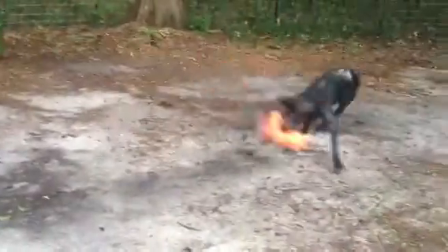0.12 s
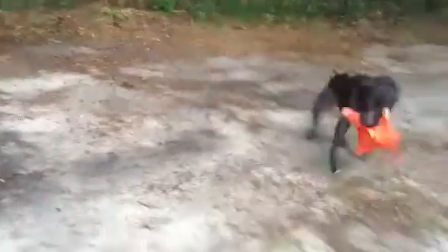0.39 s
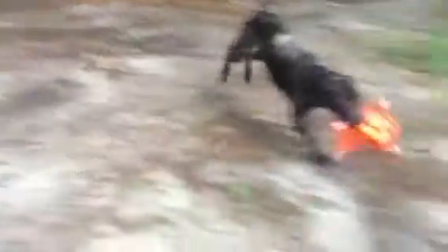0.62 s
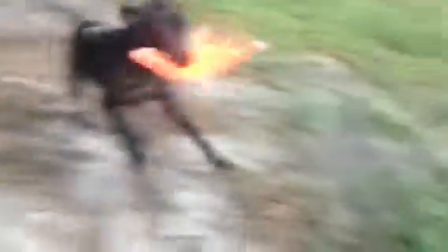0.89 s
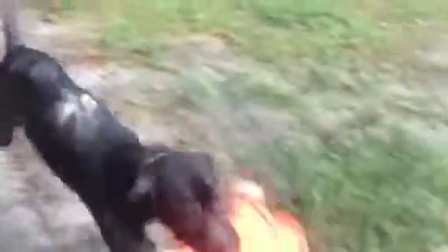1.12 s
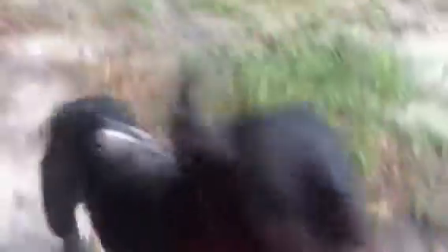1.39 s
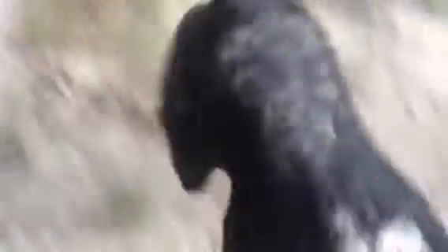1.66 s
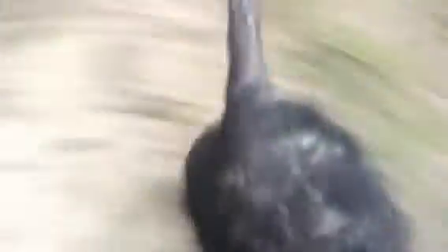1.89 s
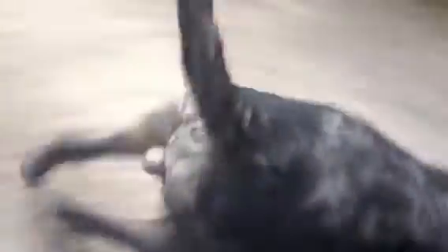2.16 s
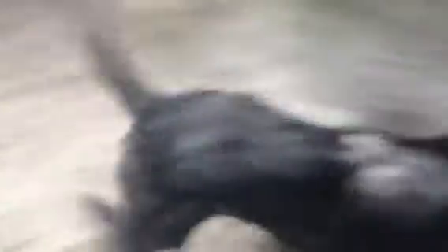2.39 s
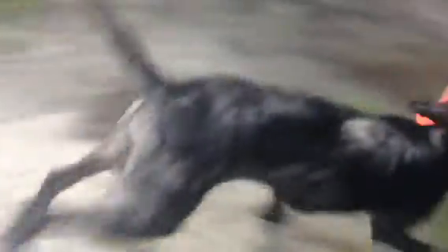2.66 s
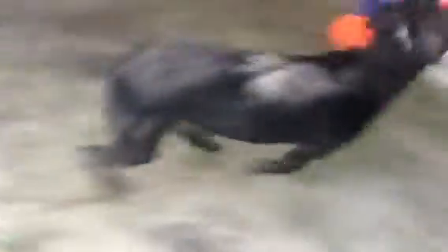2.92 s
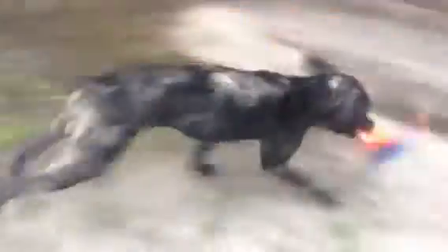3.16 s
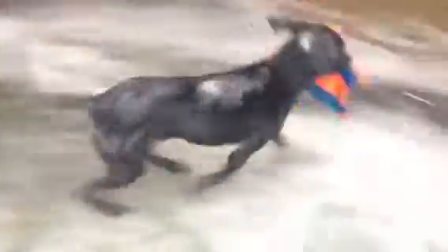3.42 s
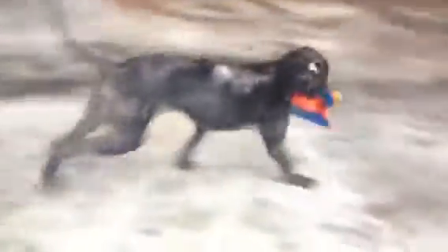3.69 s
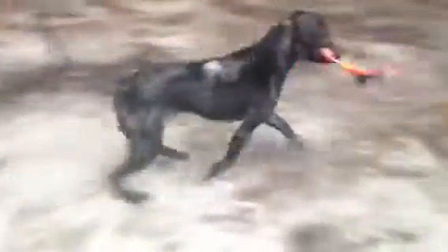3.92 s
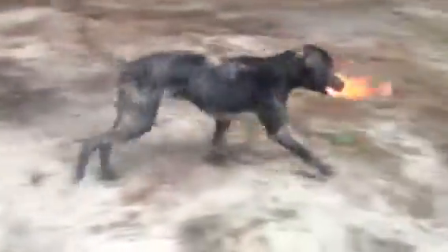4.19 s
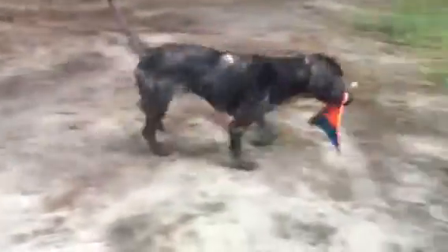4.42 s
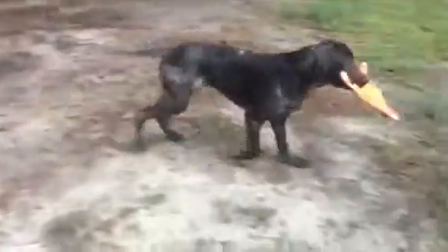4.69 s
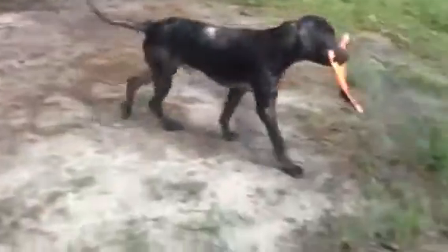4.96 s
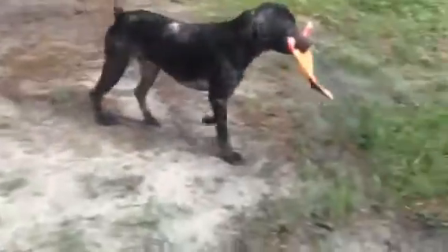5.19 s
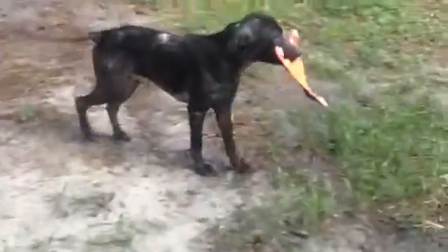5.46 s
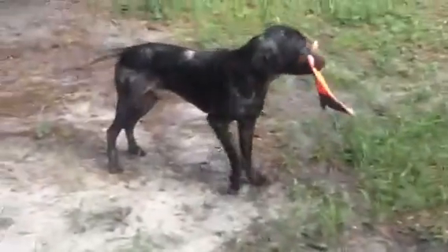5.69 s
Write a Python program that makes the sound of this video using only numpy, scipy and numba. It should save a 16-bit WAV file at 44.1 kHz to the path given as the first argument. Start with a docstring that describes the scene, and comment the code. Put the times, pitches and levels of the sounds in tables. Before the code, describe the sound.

A dense cicada chorus hisses steadily throughout, bright and smooth, strongest around 4 to 5 kHz with airy overtones above, plus a thin wavering insect tone; brief higher tones appear near 2.5 and 3.5-4.1 s. Faint distant traffic and leaves hum below. After a weak in-breath at 0.3-0.6 s, stiff fabric slaps snap at about 0.5-0.6 s, with a dull, gritty paw thud at 0.66. From 1.05 to 1.75 s come scattered soft paw falls, a short huff at 1.1, a toy slap at 1.2 and quick sniffs at 1.27 and 1.44. The chorus dips near 2 s; a huff and a low, dull slap come at 2.1. Pants follow at 2.9 and 3.7, around a cluster of paw taps and crisp slaps at 3.05-3.35. Small taps at 4.1 precede soft, slower pants at 4.4 and 5.1, then only insects until 5.8. Close, mono phone sound with faint short yard echoes.

```python
"""Dog's breath huffs and pants close by, among thudding paws on damp sand and slaps of a fabric toy.
Breath is noise through moving resonances; paws and toy are damped rings with grit or a sharp crack.
In the trees a dense cicada chorus hisses as shaped noise, with a few nearer insects as thin tones.
Distant traffic and leaves hum below; fence and trees scatter short echoes. One phone microphone."""
import sys
import numpy as np
from scipy import signal
from scipy.fft import rfft, irfft, next_fast_len
from scipy.io import wavfile
from scipy.ndimage import uniform_filter1d
from numba import njit

SR = 44100
rng = np.random.default_rng(int(sys.argv[2]) if len(sys.argv) > 2 else 0)


def log_audio(samples):
    """Write samples as a 16-bit WAV file to the path given in sys.argv[1]."""
    # one column per channel
    frames = np.atleast_2d(samples).T
    # limit to full scale, then quantise
    limited = np.clip(frames, -1, 1)
    pcm = np.round(limited * 32767).astype(np.int16)
    wavfile.write(sys.argv[1], SR, pcm)


def convert_level_to_amplitude(level_db):
    """Map a level in decibels to its linear amplitude factor."""
    exponent = np.asarray(level_db, float) / 20
    return 10 ** exponent


N = 257058

# Hard breaths out, forced by the stride. Each row: start in seconds, length in seconds,
# throat level in dB, throat resonance in Hz, sharpness in dB (mouth wide, air over the teeth).
SNORTS = [(1.118, 0.071, -44, 523, 1.5), (2.089, 0.062, -40.5, 632, 2.5)]
# Slower breaths out. Each row: start in seconds, length in seconds, throat level in dB,
# throat resonance in Hz, sharpness in dB.
PANTS = [(2.875, 0.14, -42.5, 650, -1), (3.695, 0.16, -42.5, 614, 7), (4.44, 0.18, -42, 613, -2),
         (5.13, 0.2, -45, 590, 3)]
# Breaths in, mostly weaker and higher. Each row: start in seconds, length in seconds,
# throat level in dB, throat resonance in Hz, sharpness in dB.
GASPS = [(.27, 0.13, -68, 760, 2), (.43, 0.25, -53.5, 800, -2), (2.16, 0.21, -55.5, 860, 0),
         (2.78, 0.13, -56.5, 720, 3.5), (3.39, 0.24, -53, 790, -3), (4.73, .1, -61.5, 810, -6)]
# Quick sniffs, strong in the nose. Each row: start in seconds, length in seconds,
# throat level in dB, throat resonance in Hz, sharpness in dB.
SNIFFS = [(1.265, .085, -55.5, 760, -6), (1.442, .075, -61, 640, 2.5)]
# Shape of each kind of breath. Each row: attack as a share of length, fade in dB per length,
# throat sag in Hz per second, mouth in Hz, nose in Hz, then mouth, nose and hiss in dB
# relative to the throat, before sharpness.
SNORT_SHAPE = (0.4, 19, 100, 1070, 1890, -5, -6.5, -7)
PANT_SHAPE = (0.28, 21, 900, 995, 1678, -10, -26, -30)
GASP_SHAPE = (0.27, 15.5, 402, 1035, 1717, -3.5, -6, -7)
SNIFF_SHAPE = (0.2, 40, 200, 1040, 1720, -6, 5.5, 0)
# Paw falls on the sand. Each row: start in seconds, ring peak in dB, ground ring in Hz.
PAW_FALLS = [(0.498, -40, 210), (0.662, -30.5, 185), (0.694, -40.5, 257), (1.072, -41.5, 277),
             (1.195, -40.5, 284), (1.254, -39.5, 537), (1.363, -47, 205), (1.553, -41.5, 368),
             (1.722, -45.5, 334), (2.049, -45, 213), (2.591, -42, 305), (2.747, -47.5, 211),
             (3.045, -42.5, 423), (3.078, -37, 390), (3.612, -46.5, 253), (4.094, -47, 198)]
# Slaps of the toy and claw knocks. Each row: start in seconds, ring peak in dB, ring in Hz,
# sharp crack in dB relative to the ring.
TOY_SLAPS = [(0.495, -42.5, 830, 5.5), (0.527, -33, 1070, -17), (0.533, -25.5, 1090, -8),
             (0.611, -26, 1300, -14), (1.073, -45.5, 820, -16), (1.196, -30.5, 714, -7),
             (1.557, -45, 1900, 2), (2.005, -37, 744, -12), (2.117, -25, 646, -24), (3.09, -37.5, 921, -8),
             (3.137, -31, 1320, -2.5), (3.232, -26, 970, 1), (3.306, -53, 1330, -8), (3.334, -38, 875, -15),
             (3.363, -47, 904, -8), (4.084, -44.5, 720, -6)]
# Near chorus overtones as the phone turns. Each row: time in seconds, level in dB.
NEAR_LEVEL = [(0.0, -37), (0.05, -38), (1.62, -37.5), (1.88, -40), (2.0, -43.5), (2.21, -42), (3.67, -38),
              (5.37, -40.5), (5.8, -42), (5.83, -40)]
# A higher-voiced kind further off. Each row: time in seconds, level in dB.
FAR_LEVEL = [(0.0, -48), (0.08, -51), (1.17, -48.5), (1.96, -51), (3.49, -45.5), (5.33, -49), (5.83, -47.5)]
# Near chorus, body resonance. Each row: frequency in Hz, relative density in dB per Hz.
NEAR_BODY_SPECTRUM = [(1410, -79), (2400, -28), (2740, -27), (3110, -15), (3540, -16), (4000, -9),
                      (4500, -2.5), (4900, 2), (5000, -7), (5170, -5), (5500, -7.5), (7150, -34),
                      (12100, -120)]
# Near chorus, overtones. Each row: frequency in Hz, relative density in dB per Hz.
NEAR_OVERTONE_SPECTRUM = [(4410, -34), (7500, -11.5), (8670, -2), (9540, -2), (11500, -9.5), (13900, -9.5),
                          (14700, -9.5), (15400, -30)]
# The further kind. Each row: frequency in Hz, relative density in dB per Hz.
FAR_SPECTRUM = [(3240, -14), (5500, -7), (6000, -2), (7500, -5), (9750, -31), (16500, -120)]
# Lone insects. Each row: start in seconds, end in seconds, tone in Hz, tone amplitude in dB before wavering.
LONE_INSECTS = [(0, 5.83, 4880, -53), (2.5, 2.78, 6745, -57), (3.65, 4.1, 6720, -53), (3.7, 4.1, 7242, -56),
                (3.45, 3.7, 6300, -57)]
# Distant traffic and leaves. Each row: frequency in Hz, relative density in dB per Hz.
HUM_SPECTRUM = [(18, -73), (30, -17), (80, -9), (160, -3), (334, -11), (374, -12.5), (463, -12), (510, -11),
                (707, -12), (874, -14), (962, -15.5), (2160, -20), (3000, -57), (3900, -45), (6600, -120)]

FLUTTER_HZ, FLUTTER_DB = 73.36, 2  # loose throat tissue flaps in the airflow
THROAT_WIDTH_HZ, LOWER_THROAT_RATIO = 95., .81
HOLD_SHARE = 0.66  # share of a breath's length before it fades
MOUTH_SHARE = 0.37  # how far the mouth level follows sharpness
SAG_START_SHARE, SAG_S = .55, .11  # the throat holds for this share of length, then relaxes this long
PAW_CYCLES, SLAP_CYCLES = 4.8, 6.4  # ring cycles to fall 60 dB
CRUNCH_DB = -0.5  # relative to the paw's ring
CONTACT_S = .0004  # rise of a toy slap
TURN_S = .2  # the turning of the hand is smoothed over this time
BODY_DB, BODY_FOLLOWS = -43, 0.63  # body band when overtones are at -40 dB; it beams less, so follows partly
HUM_DB = -59.5  # rms, before the microphone
YARD_T60_S, YARD_DB = .3, -18  # echo decay; echo energy relative to the direct sound


def level(x, db):
    """Scale to an rms level in dB."""
    return x * convert_level_to_amplitude(db) / np.sqrt(np.mean(x ** 2))


def walk(rate):
    """Random levels held 1 / rate seconds and slewed twice; spread near 1."""
    hold = int(SR / rate)
    steps = np.repeat(rng.standard_normal(N // hold + 1), hold)
    slewed = uniform_filter1d(uniform_filter1d(steps, hold), hold)
    return 1.3 * slewed[:N]


def coloured(spectrum):
    """Noise with the given spectrum in Hz and dB, rms 1."""
    size = next_fast_len(N)
    hz, db = np.transpose(spectrum)
    f = np.maximum(np.arange(size // 2 + 1) * SR / size, 1)
    gain = convert_level_to_amplitude(np.interp(np.log(f), np.log(hz), db, left=-90, right=-90))
    noise = irfft(rfft(rng.standard_normal(size)) * gain, size)
    return level(noise[:N], 0)


def add(out, s, sound):
    """Mix a short sound in at time s."""
    i = int(s * SR)
    out[i:i + len(sound)] += sound[:N - i]


def ring(hz, t60, rise_s):
    """A damped ring that swells over the contact time, peak 1."""
    t = np.arange(int(.08 * SR)) / SR
    decay = np.exp(-np.log(1000) * t / t60)
    y = np.sin(2 * np.pi * hz * t) * decay * (1 - np.exp(-t / rise_s))
    return y / np.abs(y).max()


@njit
def svf(x, hz, width):
    """State-variable band-pass with a moving centre, gain 1 at the centre."""
    y, band, low = np.empty(len(x)), 0., 0.
    for i in range(len(x)):
        g, k = np.tan(np.pi * hz[i] / SR), width / hz[i]
        v = (band + g * (x[i] - low)) / (1 + g * (g + k))
        band, low, y[i] = 2 * v - band, low + 2 * g * v, k * v
    return y


def resonance(air, hz, width):
    """A steep-sided resonance from two band-passes in series, rms 1."""
    return level(svf(svf(air, hz, width), hz, 1.75 * width), 0)


def breath_controls():
    """Each breath swells, holds and dies away as the throat relaxes; returns four gains, three resonances."""
    t = np.arange(N) / SR
    gains, hz = np.zeros((4, N)), np.full((3, N), 1000.)
    kinds = (SNORTS, SNORT_SHAPE), (PANTS, PANT_SHAPE), (GASPS, GASP_SHAPE), (SNIFFS, SNIFF_SHAPE)
    breaths = sorted((breath, shape) for table, shape in kinds for breath in table)
    for (start, length, db, throat_hz, sharp_db), shape in breaths:
        attack, fade_db, sag_hz, mouth_hz, nose_hz, mouth_db, nose_db, hiss_db = shape
        share = (t - start) / length
        after_hold = np.maximum(share - HOLD_SHARE, 0)
        flow = np.clip(share / attack, 0, 1) * convert_level_to_amplitude(db - fade_db * after_hold)
        mouth_rel_db = mouth_db + MOUTH_SHARE * sharp_db
        gains += flow * convert_level_to_amplitude(np.array([[0], [mouth_rel_db], [nose_db + sharp_db], [hiss_db + sharp_db]]))
        # the resonances stay put until the next breath begins
        now = t >= start
        relaxing_s = np.clip(t - start - SAG_START_SHARE * length, 0, SAG_S)
        hz[0, now] = throat_hz - sag_hz * relaxing_s[now]
        hz[1:, now] = [[mouth_hz], [nose_hz]]
    return gains, hz


def panting():
    """Fluttering turbulent breath rings twin throat, mouth and nose resonances, with hiss at the teeth."""
    gains, (throat_hz, mouth_hz, nose_hz) = breath_controls()
    throat_gain, mouth_gain, nose_gain, hiss_gain = gains
    air = rng.standard_normal(N) * convert_level_to_amplitude(FLUTTER_DB * walk(FLUTTER_HZ * 2))
    throat = resonance(air, throat_hz, THROAT_WIDTH_HZ)
    # the throat resonance is partly evened out, so its level swings less than plain noise
    power = uniform_filter1d(throat ** 2, size=1100)
    throat = level(throat / (.3 + power) ** .35, 0)
    lower_throat = convert_level_to_amplitude(-8.0) * resonance(air, LOWER_THROAT_RATIO * throat_hz, 123.0)
    out = (throat + lower_throat) * throat_gain
    out += resonance(air, mouth_hz, 207.0) * mouth_gain
    out += resonance(air, nose_hz, 274.0) * nose_gain
    rough_air = air * convert_level_to_amplitude(3.5 * walk(400))
    out += resonance(rough_air, np.full(N, 2100.), 1500.0) * hiss_gain
    return out


def paws():
    """A soft pad thumps the sand; grains crunch briefly under it."""
    out = np.zeros(N)
    grit = rng.standard_normal((len(PAW_FALLS), 1000))
    for (s, db, hz), grains in zip(PAW_FALLS, grit):
        fade = np.exp(-np.arange(len(grains)) / SR / 0.0095)
        crunch = uniform_filter1d(grains, size=14) * fade
        add(out, s, convert_level_to_amplitude(db) * ring(hz, PAW_CYCLES / hz, .5 / hz))
        add(out, s, convert_level_to_amplitude(db + CRUNCH_DB) * crunch / np.abs(crunch).max())
    return out


def slaps():
    """Stiff fabric snaps: a short ring, a low push of air and a sharper crack on top."""
    out = np.zeros(N)
    air_push = convert_level_to_amplitude(-13.5) * ring(328, 0.013, 0.0023)
    crack = ring(2230, 0.0058, .0001)
    for s, db, hz, crack_db in TOY_SLAPS:
        body = ring(hz, SLAP_CYCLES / hz, CONTACT_S)
        add(out, s, convert_level_to_amplitude(db) * (body + air_push + convert_level_to_amplitude(crack_db) * crack))
    return out


def yard_echoes(dog):
    """Fence and trees return a short decaying scatter, starting 6 ms after the direct sound."""
    t = np.arange(int(.4 * SR)) / SR
    echoes = rng.standard_normal(len(t)) * np.exp(-np.log(1000) * t / YARD_T60_S) * (t > .006)
    echoes = uniform_filter1d(echoes, size=8)  # soft ground and leaves return little treble
    echoes *= convert_level_to_amplitude(YARD_DB) / np.sqrt(np.sum(echoes ** 2))
    return signal.fftconvolve(dog, echoes)[:N]


def turning_level(table):
    """Level in dB over time as the phone turns, smoothed to the pace of the hand."""
    path = np.interp(np.arange(N) / SR, *np.transpose(table))
    return uniform_filter1d(path, size=int(TURN_S * SR))


def cicadas():
    """Countless tymbals blur into smooth hiss on the body resonance and its overtones."""
    near_db, far_db = turning_level(NEAR_LEVEL), turning_level(FAR_LEVEL)
    shimmer = .3 * walk(6)
    body_db = BODY_DB + BODY_FOLLOWS * (near_db + 40)
    body = coloured(NEAR_BODY_SPECTRUM) * convert_level_to_amplitude(body_db + shimmer + .5 * walk(90))
    far = coloured(FAR_SPECTRUM) * convert_level_to_amplitude(far_db + shimmer)
    overtones = coloured(NEAR_OVERTONE_SPECTRUM) * convert_level_to_amplitude(near_db + shimmer + 0.38 * walk(90))
    return body + far + overtones


def singers():
    """Single nearer insects stand out as thin tones that waver in level and slightly in pitch."""
    t, out = np.arange(N) / SR, np.zeros(N)
    for start, end, hz, db in LONE_INSECTS:
        swell = np.interp(t, [start, start + .06, end - .04, end], [0, 1, 1, 0])
        tone = np.sin(2 * np.pi * np.cumsum(hz + 12 * walk(25)) / SR)
        out += convert_level_to_amplitude(db + 2.5 * walk(12)) * swell * tone
    return out


def hum():
    """Distant traffic and leaves: low shaped noise, gently uneven."""
    return level(coloured(HUM_SPECTRUM) * convert_level_to_amplitude(1.3 * walk(14)), HUM_DB)


def scene():
    """The dog and its yard echoes under the insects and hum; one microphone, the same in both channels."""
    dog = panting() + paws() + slaps()
    mono = dog + yard_echoes(dog) + cicadas() + singers() + hum()
    return np.array([mono, mono])


def roll_off(x):
    """The treble ends steeply here."""
    return signal.sosfilt(signal.butter(12, 15810, fs=SR, output="sos"), x)


def record(dry):
    """The phone microphone path cuts the bass steeply and the very top."""
    bass_cut = signal.butter(3, 105, "high", fs=SR, output="sos")
    top_cut = signal.ellip(10, .2, 70, 15300, fs=SR, output="sos")
    mix = signal.sosfilt(np.vstack([bass_cut, top_cut]), dry)
    return roll_off(mix)


dry = scene()
out = record(dry)
log_audio(out)
```